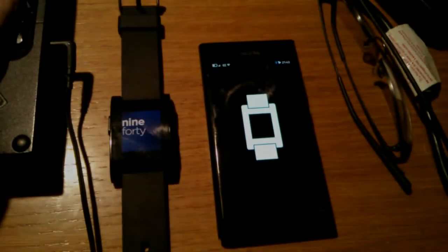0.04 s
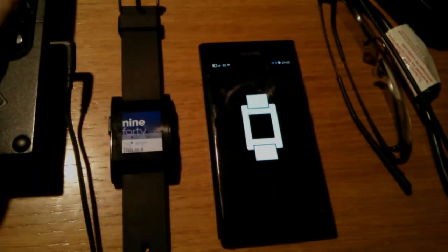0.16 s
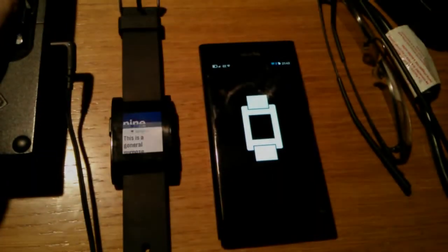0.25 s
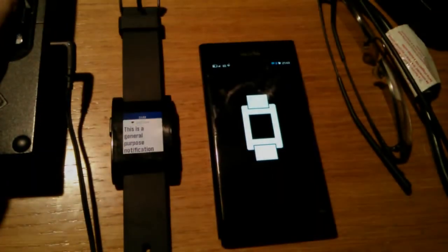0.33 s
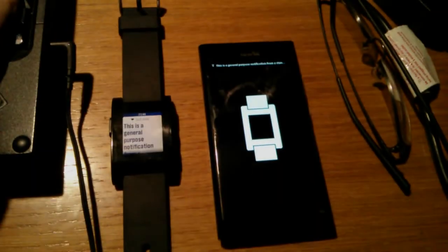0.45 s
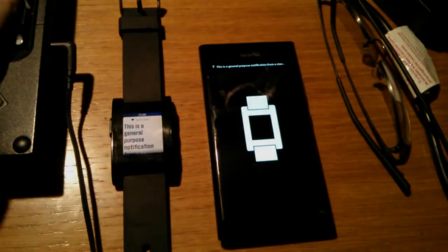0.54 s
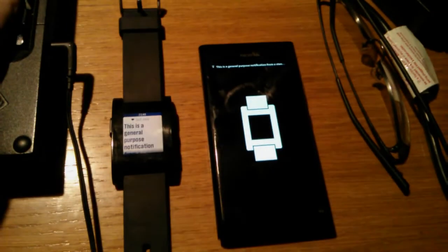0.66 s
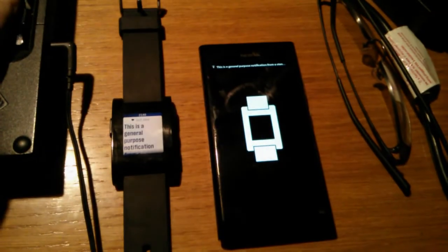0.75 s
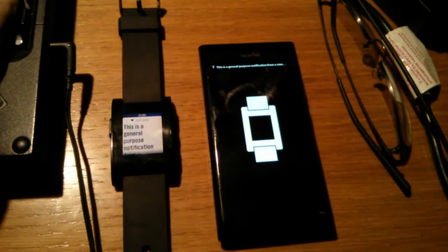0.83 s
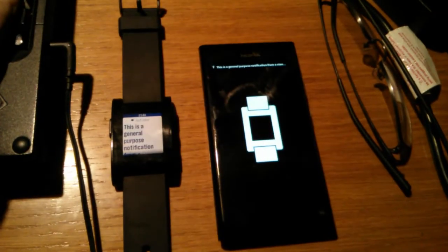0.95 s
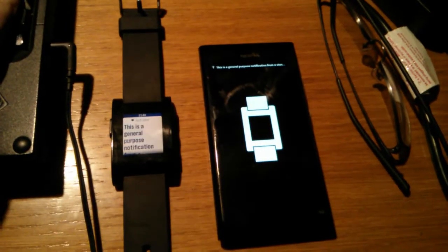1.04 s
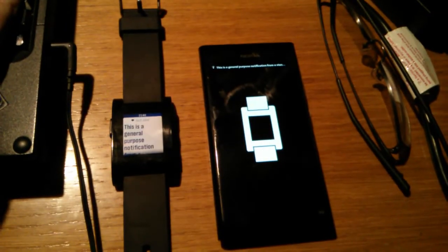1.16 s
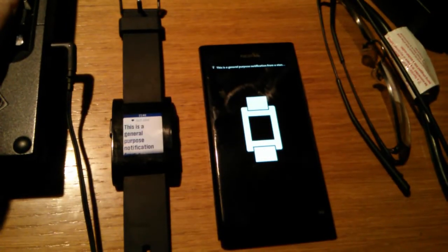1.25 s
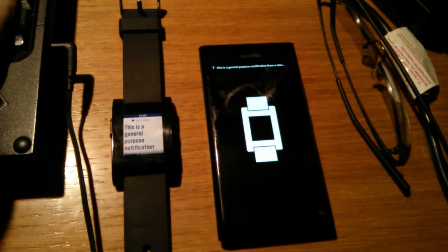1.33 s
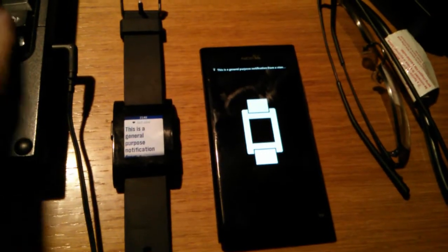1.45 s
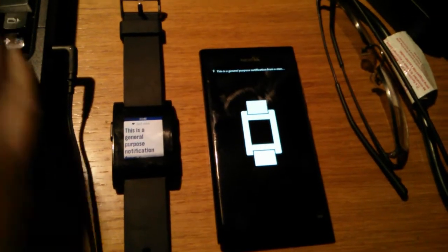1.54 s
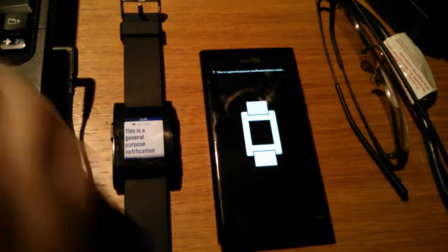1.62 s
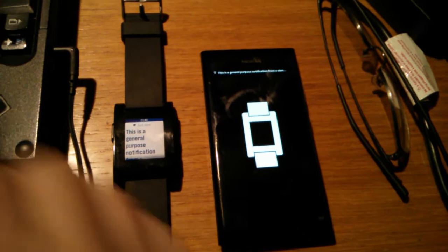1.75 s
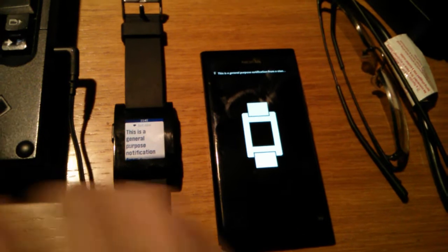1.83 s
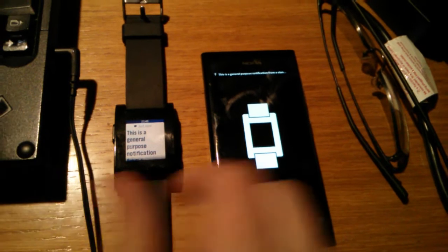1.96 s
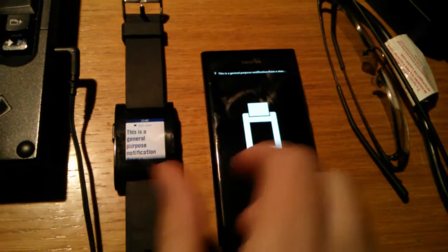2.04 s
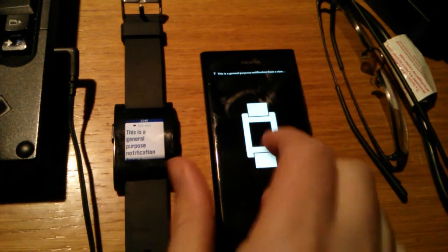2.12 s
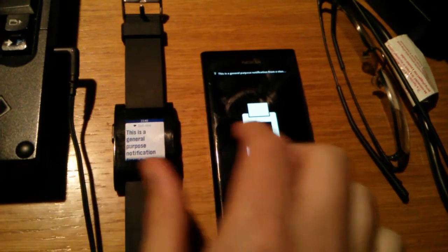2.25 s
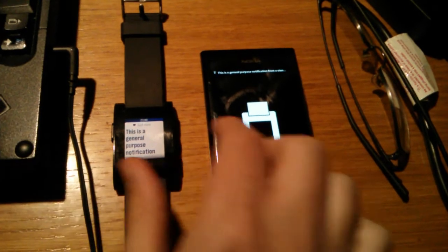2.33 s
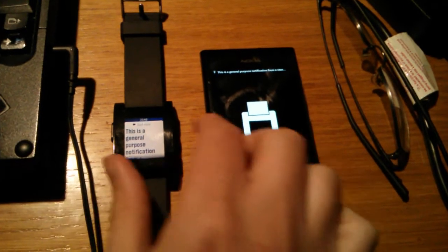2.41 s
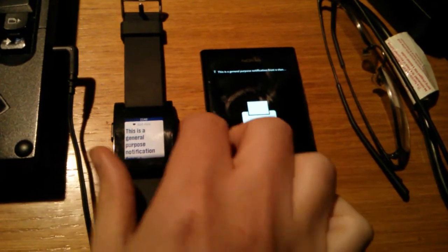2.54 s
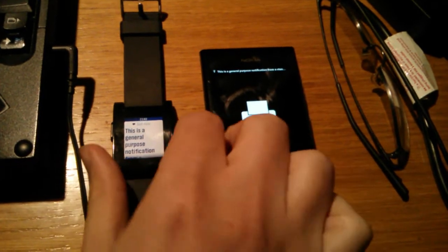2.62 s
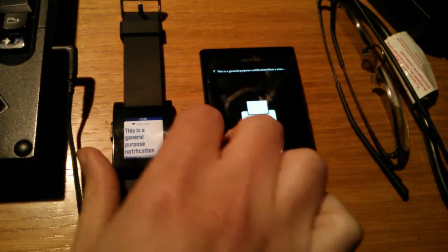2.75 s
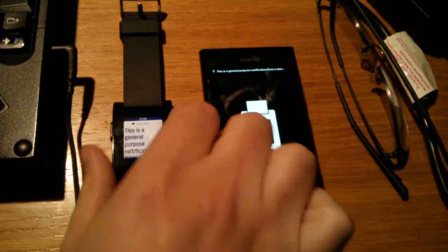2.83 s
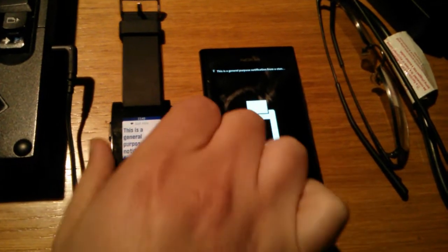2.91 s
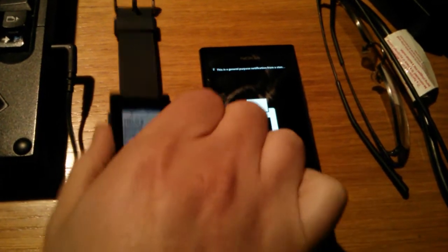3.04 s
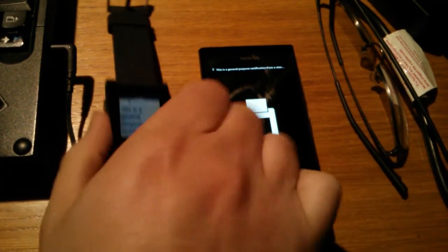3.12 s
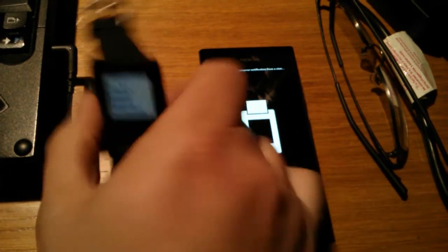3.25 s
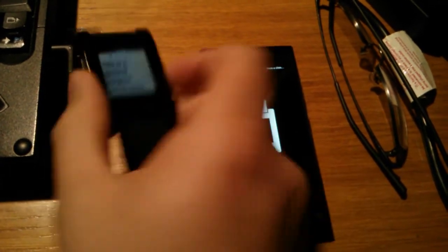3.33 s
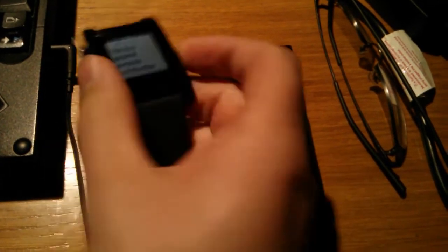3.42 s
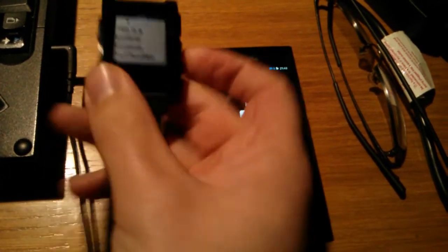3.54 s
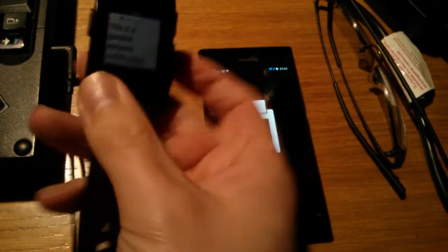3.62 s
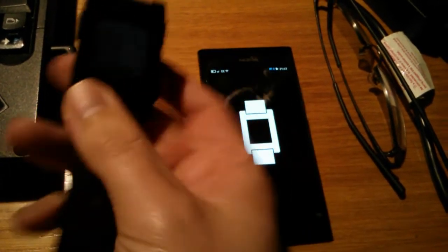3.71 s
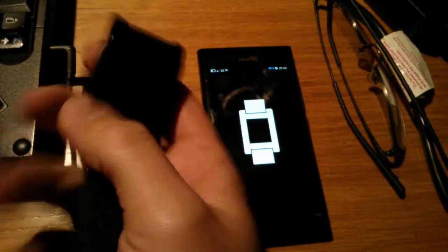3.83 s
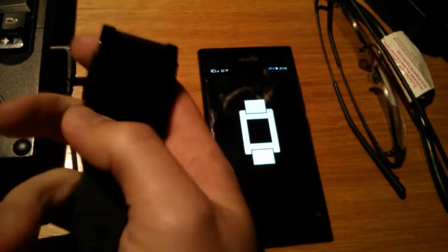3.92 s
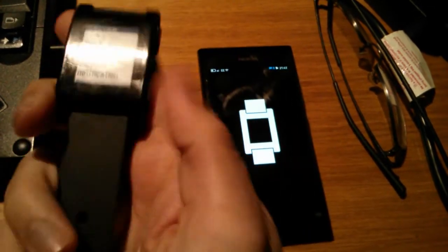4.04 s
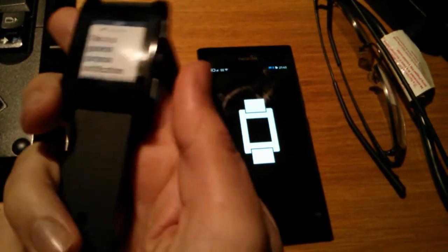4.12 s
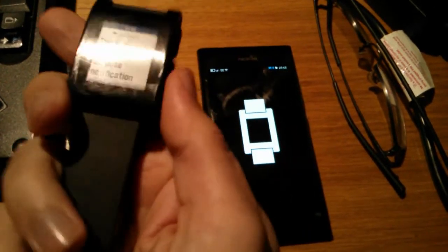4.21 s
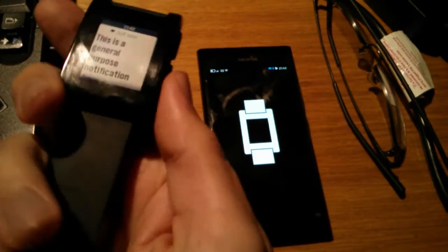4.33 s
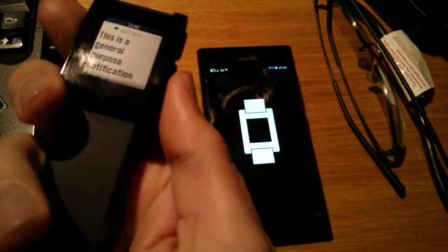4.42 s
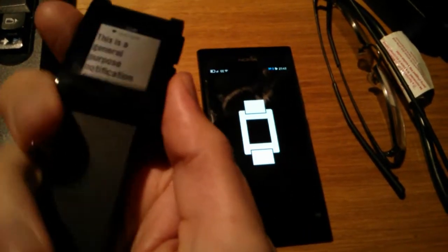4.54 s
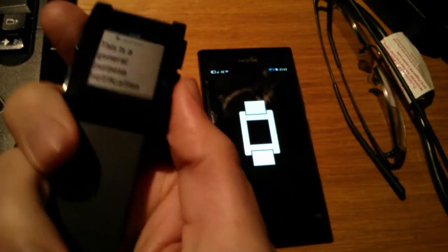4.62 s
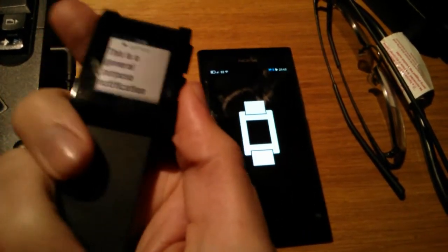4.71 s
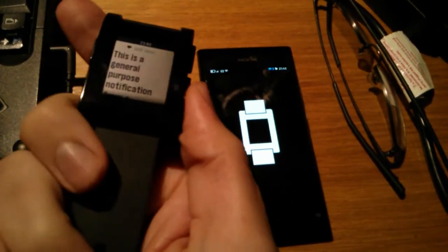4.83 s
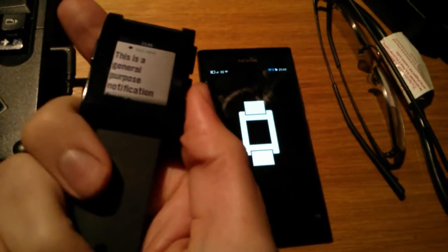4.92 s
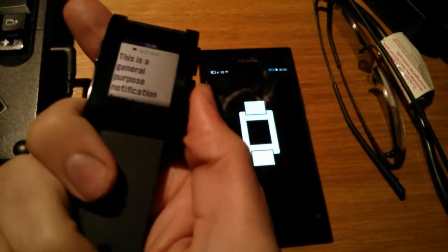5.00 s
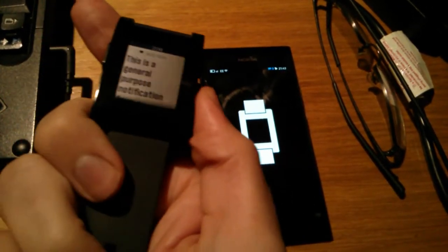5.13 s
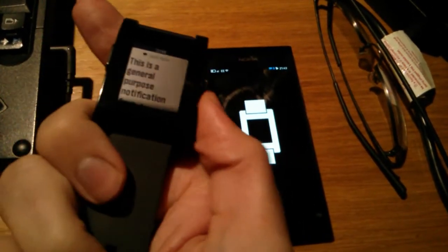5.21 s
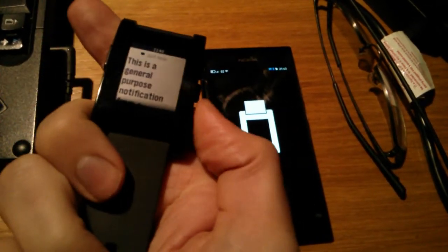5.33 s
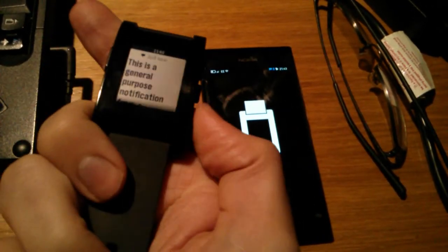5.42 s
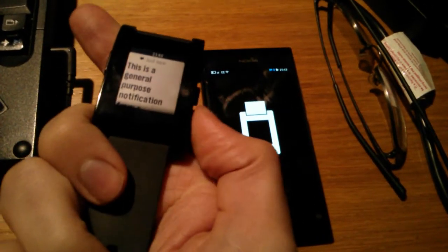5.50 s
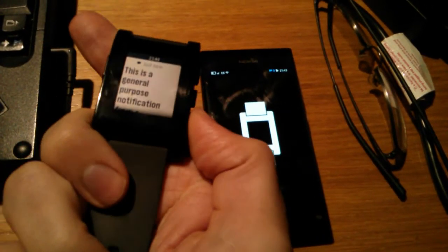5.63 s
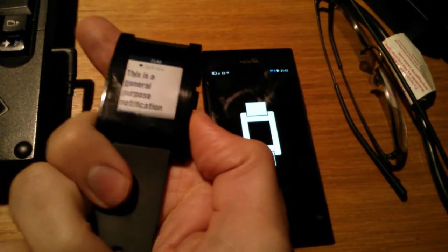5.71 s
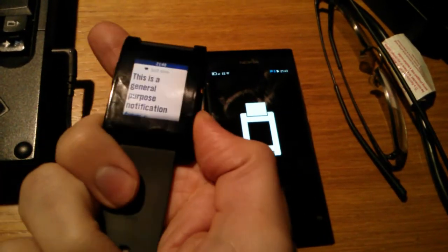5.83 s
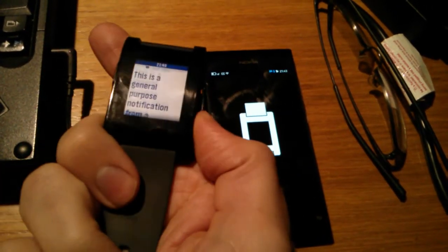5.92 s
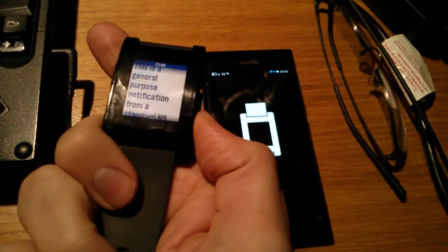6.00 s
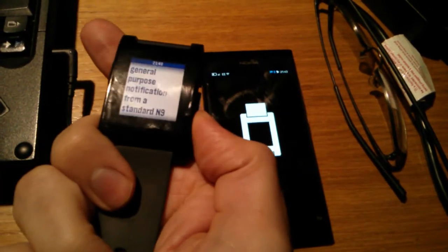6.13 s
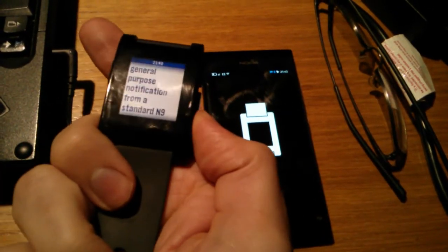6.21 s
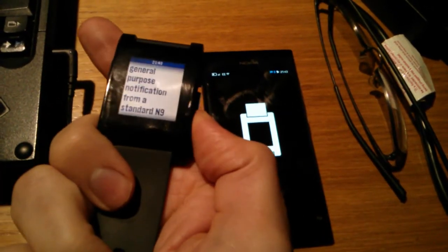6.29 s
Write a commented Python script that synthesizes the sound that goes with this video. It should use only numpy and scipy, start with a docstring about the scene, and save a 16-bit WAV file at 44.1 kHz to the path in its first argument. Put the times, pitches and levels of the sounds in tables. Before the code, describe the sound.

In a quiet room, over faint hiss, hum and rumble, a watch's small motor gives one brief, rattling buzz against a wooden desk. A light click follows, then after a pause a dull knock on the wood. The watch scrapes and taps as it is lifted; its buckle and strap snap, squeak softly and clack twice, the loudest sounds of all. Then only the background and one tiny tick remain. The microphone is close.

```python
"""Low rumble, a hum and microphone hiss fill a quiet room where a wrist watch lies on a wooden desk.
First its small motor buzzes once: an off-centre weight shakes the wood and the shaft rattles.
A second later something nearby clicks. Then a hand knocks the desk and drags the watch up:
the case scrapes, the strap squeaks, strap and buckle click. One faint tick comes near the end."""
import sys
import numpy as np
from scipy import signal
from scipy.fft import rfft, irfft
from scipy.io import wavfile
from scipy.ndimage import uniform_filter1d

SR = 44100
rng = np.random.default_rng(int(sys.argv[2]) if len(sys.argv) > 2 else 0)


def waveform_to_disk(signal):
    """Save audio, clipped to [-1, 1], as 16-bit WAV at the path in sys.argv[1]."""
    frames = np.transpose(np.atleast_2d(signal))
    scaled = np.clip(frames, -1, 1) * 32767
    samples = np.round(scaled).astype(np.int16)
    wavfile.write(sys.argv[1], SR, samples)


N = 280476
T = np.arange(N) / SR


def gain_of(db):
    """Turns decibels into a number to multiply by."""
    return 10 ** (np.asarray(db) / 20)


def unit_rms(x):
    """Scales a sound to an average strength (rms) of 1."""
    return x / np.sqrt(np.mean(x ** 2) + 1e-20)


def curves(rows, at=T):
    """Draws straight lines between a table's rows and reads off each later column."""
    points, *columns = np.transpose(rows)
    return [np.interp(at, points, column) for column in columns]


def add(mix, start_s, sound):
    """Mixes a sound in at its start time."""
    part = mix[round(start_s * SR):][:len(sound)]
    part += sound[:len(part)]


def resonate(x, hz, width_hz):
    """Keeps the sound near one pitch: shifts that pitch down to zero, smooths, shifts back."""
    turn = np.exp(2j * np.pi * np.cumsum(hz * np.ones(len(x))) / SR)
    keep = np.exp(-np.pi * width_hz / SR)
    return 2 * (turn * signal.lfilter([1 - keep], [1, -keep], x / turn)).real


def noise_band(count, first, second):
    """Noise passed through two resonances, each given as (pitch_hz, width_hz)."""
    return unit_rms(resonate(resonate(rng.standard_normal(count), *first), *second))


def noise(spectrum):
    """Steady noise with the given balance of low and high pitches."""
    hz, db = np.transpose(spectrum)
    shape_db = np.interp(np.log(np.fft.rfftfreq(N, 1 / SR) + 1), np.log(hz + 1), db)
    return unit_rms(irfft(rfft(rng.standard_normal(N)) * gain_of(shape_db), N))


def ring(modes, rise_s=.00079, spread_db=0.):
    """A struck part's tones, each fading 60 dB in its ring_s; where the blow lands changes the mix."""
    t = np.arange(6000) / SR
    out = np.zeros(len(t))
    for hz, db, ring_s in modes:
        louder, higher = spread_db * rng.standard_normal(2)
        tone = np.sin(2 * np.pi * hz * (1 + .00087 * higher) * t)
        out += gain_of(db + louder - 60 * t / ring_s) * tone
    out *= 1 - np.exp(-t / rise_s)
    return out / abs(out).max()


# The rumble's tone: pitch_hz, relative_db
RUMBLE_TONE = [(8.8, -41), (15, -11.5), (43, 1), (81, 0), (113, -1), (145, -3.5), (169, -7.5), (189, -3.5),
               (238, -16), (320, -24.5), (420, -57), (700, -120)]
# Its loudness: time_s, level_db
RUMBLE_LOUDNESS = [(0.0, -73), (0.23, -68), (0.41, -61.5), (1.17, -72), (1.5, -64.5), (2.53, -70.5),
                   (2.99, -61), (4.18, -70.5), (4.94, -66), (5.44, -69), (5.86, -65.5), (6.36, -64)]

def rumble():
    """A low rumble that rises and falls unevenly."""
    lumps = unit_rms(uniform_filter1d(uniform_filter1d(rng.standard_normal(N), 3000), 3000))
    return gain_of(curves(RUMBLE_LOUDNESS)[0] + 1.5 * lumps) * noise(RUMBLE_TONE)


# The hum's swells: peak_s, level_db, half_length_s
HUM_SWELLS = [(3.1, -62.5, .22), (6.3, -62.5, .45)]

def hum(pitch_hz=148.3, steady_db=-75.5):
    """A fuzzy hum that swells twice."""
    swells = sum(gain_of(db) * np.exp(-((T - s) / half) ** 2) for s, db, half in HUM_SWELLS)
    return (gain_of(steady_db) + swells) * noise_band(N, (pitch_hz, 36), (pitch_hz, 9.4))


# The hiss's tone: pitch_hz, relative_db
HISS_TONE = [(150, -36), (250, -5.5), (369, -6), (444, -6), (563, -9), (623, -6), (830, -9), (934, -4),
             (1070, -10.5), (2000, -15), (2490, -23), (9460, -13.5), (14200, -11.5), (16500, -11.5)]
# Its loudness: time_s, level_db
HISS_LOUDNESS = [(0, -77), (.8, -75), (2.7, -75), (3.6, -68), (4.4, -74.5), (6.36, -76)]

def hiss(whine_hz=15000, whine_relative_db=-6):
    """Microphone hiss and a thin electronic whine drift in loudness together."""
    whine = gain_of(whine_relative_db) * np.sqrt(2) * np.sin(2 * np.pi * whine_hz * T)
    return gain_of(curves(HISS_LOUDNESS)[0]) * (noise(HISS_TONE) + whine)


# How the room rings on: pitch_hz, ring_s, relative_db
ROOM_TAIL = [(200, .25, -2), (700, 0.33, -3), (1400, 0.18, -0.5), (2050, .22, 3), (3000, 0.15, -4.5),
             (5000, 0.22, -3), (8000, 0.22, -4.5), (12094, 0.15, -5)]

def room(x, near_db=-6, wall_db=-19, tail_db=-15):
    """Sound bounces off things on the desk, then off one wall, then dies away in the room."""
    t = np.arange(SR // 2) / SR
    bounces = np.zeros(len(t))
    at = np.arange(0, len(t) - 10, 10) + rng.integers(0, 10, (len(t) - 1) // 10)
    bounces[at] = rng.choice([-1., 1.], len(at))
    near = bounces * np.exp(-t / .005) * (t > .0008)
    hz, frame_s, bands = signal.stft(bounces * (t > .006), SR, nperseg=256)
    ring_s, colour_db = curves(ROOM_TAIL, hz[:, None])
    bands *= gain_of(colour_db - 60 * frame_s / ring_s)
    tail = signal.istft(bands, SR, nperseg=256)[1][:len(t)]
    echo = gain_of(near_db) * near / np.linalg.norm(near)
    echo += gain_of(tail_db) * tail / np.linalg.norm(tail)
    echo[round(.0105 * SR)] += gain_of(wall_db)
    return x + signal.fftconvolve(x, echo)[:N]


# Soft pushes on the desk: start_s, level_db, pitch_hz
DESK_PUSHES = [(1.410, -52.5, 79), (1.437, -49.5, 69), (2.744, -40, 208), (2.885, -48.5, 147),
               (3.066, -54.5, 135), (3.173, -52.5, 149)]

def thuds():
    """A hand or the watch presses on the desk, which swings for a few low cycles."""
    out = np.zeros(N)
    for start_s, db, hz in DESK_PUSHES:
        add(out, start_s, gain_of(db) * ring([(hz, 0, .07)], rise_s=.0017))
    return out


def stroke(start_s, peak_s, peak_db, rise_db_per_s, fall_db_per_s):
    """Times, level and gain of one rub: it sets in, grows to its peak and fades."""
    t = np.arange(start_s, peak_s + 40 / fall_db_per_s, 1 / SR)
    level_db = peak_db - np.where(t < peak_s, rise_db_per_s, fall_db_per_s) * abs(t - peak_s)
    fade_in = np.minimum((t - start_s) / .017, 1) ** 2
    return t, level_db, fade_in * gain_of(level_db)


# Light touches: peak_s, level_db, fall_db_per_s, airy_relative_db
BRUSHES = [(1.412, -68.5, 114, 4), (2.762, -72, 141, -4), (2.886, -74, 350, -9)]

def brushing():
    """Skin or a sleeve brushes past: soft, bright noise with an airy top."""
    out = np.zeros(N)
    for peak_s, db, fall, airy_db in BRUSHES:
        t, _, gain = stroke(peak_s - .02, peak_s, db, 300, fall)
        brush = noise_band(len(t), (6600, 3000), (4800, 4400))
        airy = noise_band(len(t), (14000, 4000), (15000, 5000))
        add(out, t[0], gain * (brush + gain_of(airy_db) * airy))
    return out


# Rubs of the strap: peak_s, level_db
STRAP_RUBS = [(3.527, -56.5), (3.553, -57), (3.598, -74)]

def squeaks(pitch_hz=1933):
    """The strap rubs and gives short, fuzzy squeaks."""
    out = np.zeros(N)
    for peak_s, db in STRAP_RUBS:
        t, _, gain = stroke(peak_s - .03, peak_s, db, 900, 900)
        add(out, t[0], gain * noise_band(len(t), (pitch_hz, 280), (pitch_hz, 450)))
    return out


# Tones of the desk, watch case and clasp (also used below): pitch_hz, relative_db, ring_s
DESK_TONES = [(374, -6, 0.061), (406, 8, 0.043), (452, -4.5, 0.066), (676, -19, 0.036)]
CASE_TONES = [(790, -6, .03), (964, -2, .03), (1200, -3, .028), (1380, 0, .032), (1600, -5, .022),
              (1800, 0, .024), (1990, 0, .026), (2350, -5, .022)]
CLASP_TONES = [(2665, -8, .022), (2990, -1, .021), (3335, -3, .02), (3680, -4, .022), (4000, -4, .02),
               (4450, -2, .014), (4690, -2, .012), (5200, -5, .015), (5600, -6, .015), (6350, -7, .016)]
# Pulls across the wood: start_s, peak_s, level_db, fall_db_per_s
PULLS = [(3.076, 3.098, -74, 304), (3.223, 3.348, -50.5, 900)]

def dragging(slips_per_s=2500, rise_db_per_s=97):
    """The watch slides in tiny, uneven slips that knock its case and, as pressure builds, its clasp."""
    out = np.zeros(N)
    for start_s, peak_s, db, fall in PULLS:
        t, level_db, gain = stroke(start_s, peak_s, db, rise_db_per_s, fall)
        slips = gain_of(3.78 * rng.exponential(1, (2, len(t))))
        slips *= rng.random(slips.shape) < slips_per_s / SR
        slips *= rng.choice([-1., 1.], slips.shape)
        body = ring(CASE_TONES) + .584 * ring(CASE_TONES[1:4]) + .13 * ring(DESK_TONES)
        clasp = ring(CLASP_TONES[:5]) * np.exp(-np.arange(6000) / 100)
        dull = unit_rms(signal.oaconvolve(slips[0], body)[:len(t)])
        bright = unit_rms(signal.oaconvolve(slips[1], clasp)[:len(t)])
        bright_db = -1.5 + 1.1 * (level_db + 48.5)  # louder is also brighter
        add(out, start_s, gain * (dull + gain_of(bright_db) * bright))
    return out


# Tones of the buckle pin and of something small beside the desk: pitch_hz, relative_db, ring_s
PIN_TONES = [(6770, -7, .018), (7000, -8, .018), (7830, -1, .024), (8060, -3, .022), (8450, -6, .025),
             (9200, -11, .02), (10300, -15, .02), (11600, -20, .02)]
NEARBY_TONES = [(960, 0, .028), (1250, -10, .02), (1990, -4, .022), (2250, -6, .025), (3500, -8, .012)]
# What each mix adds to ring_db: crack_db, desk_db, case_or_nearby_db, clasp_db, pin_db
MIXES = {"click": (-10, -19.5, -0.5, -13, -32), "tap": (-17, -17.5, -0.5, -16, -24),
         "knock": (-19, -1.5, -29, -42, -44), "tick": (-8, -10, -9, -17, 0), "snap": (2, -17, -11, -6, -1),
         "clack": (-8.5, -18.5, -4, -1, -24)}
# Short sounds: start_s, tick_db, tick_hz, ring_db, mix_name (picks a row of MIXES; "click" also rings the
# nearby object's tones in place of the case's) The row at 3.802 s is a faint low sound just before the clack.
SHORT_SOUNDS = [(1.3929, -32.5, 6150, -42, "click"), (1.405, -53, 9500, -50.5, "click"),
                (2.412, -74, 1000, -74, "tap"), (2.424, -57.5, 7000, -71, "tick"),
                (2.7430, -30, 5560, -31, "knock"), (3.0923, -57.5, 2470, -71, "tap"),
                (3.255, -61, 7000, -62, "tick"), (3.2989, -54, 6370, -41.5, "tap"),
                (3.314, -49, 8000, -47.5, "tap"), (3.3413, -50, 4000, -32, "tap"),
                (3.352, -59, 7000, -44, "tap"), (3.4468, -10, 7800, -26, "snap"),
                (3.458, -14, 6050, -28, "snap"), (3.7193, -47.5, 3320, -38.5, "tap"),
                (3.802, -65.5, 998, -53.5, "tap"), (3.812, -8.5, 6670, -19.5, "clack"),
                (3.8655, -14, 8000, -21.5, "clack"), (5.7945, -59, 7000, -81, "tick")]

def clicks():
    """Each short sound is a tick, a noisy crack and the ringing of hard parts."""
    out = np.zeros(N)
    t, crack_t = np.arange(-40, 120) / SR, np.arange(2000) / SR
    tick_shape = np.exp(-np.where(t < 0, (t / .00012) ** 2, t / .00022))
    swell = 1 - np.exp(-crack_t / .001)  # the crack builds just behind the tick
    for start_s, tick_db, tick_hz, ring_db, mix_name in SHORT_SOUNDS:
        crack_db, *part_db = ring_db + np.array(MIXES[mix_name])
        add(out, start_s + t[0], gain_of(tick_db) * tick_shape * np.sin(2 * np.pi * tick_hz * t))
        crack = noise_band(len(crack_t), (tick_hz, 3600), (tick_hz, 4500))
        add(out, start_s, gain_of(crack_db - 60 * crack_t / .036) * crack * swell)
        parts = (ring(DESK_TONES, .00042, 1.7),
                 ring(NEARBY_TONES if mix_name == "click" else CASE_TONES, .0011, .6),
                 ring(CLASP_TONES, .0035, 1.),
                 ring(PIN_TONES, .00039, .8))
        add(out, start_s, gain_of(part_db) @ parts)
    return out


def desk_boost(hz):
    """The desk answers most strongly near its two resonances."""
    return 1 + 2.9 / (1 + ((hz - 370) / 40) ** 2) + 11 / (1 + ((hz - 222) / 12) ** 2)


FULL_SPEED_HZ = 119.7  # motor turns per second
# Tones of the bouncing watch: multiple_of_motor_speed, relative_db
BUZZ_TONES = [(1, -23), (2, -11), (3, 0), (4, -1), (5, -14), (6, -7), (7, -23), (8, -11), (9, -29),
              (10, -21), (11, -40), (12, -36), (13, -42), (14, -32), (15, -31), (16, -23), (17, -38),
              (18, -36), (19, -43), (20, -46), (21, -50), (22, -41)]

def bouncing(speed_hz, turns, slowness):
    """The watch pushes on the wood; the tones waver as the contact shifts."""
    wavers = uniform_filter1d(rng.standard_normal((len(BUZZ_TONES), len(turns))), 500, axis=1)
    out = np.zeros(len(turns))
    for (k, db), waver in zip(BUZZ_TONES, wavers):
        level_db = db + 1.94 * unit_rms(waver) - 10 * k * slowness  # a slow motor sounds duller
        boost = desk_boost(k * speed_hz) / desk_boost(k * FULL_SPEED_HZ)
        out += gain_of(level_db) * boost * np.cos(2 * np.pi * k * turns + .4 * k ** 2)
    return out


# Tones of the motor's housing: pitch_hz, width_hz, relative_db
HOUSING_TONES = [(5730, 310, -6.5), (6040, 510, 3.5), (7800, 1000, -4.5), (10000, 2300, -5.5),
                 (11500, 1300, 1.5), (14100, 2300, -1.5)]

def rattling(turns, slowness, flare):
    """Twice a turn the shaft knocks its housing; flare lifts the lowest tone."""
    beats = np.diff(np.floor(2 * turns), prepend=0) * gain_of(.97 * rng.standard_normal(len(turns)))
    grit = np.exp(-(2 * turns % 1) / 3) * rng.standard_normal(len(turns))
    knocks = unit_rms(beats) + grit
    sag = 1 - .08 * slowness  # lower in pitch while the shaft is slow
    tones = [gain_of(db) * resonate(resonate(knocks, hz * sag, width), hz * sag, width) / np.sqrt(width)
             for hz, width, db in HOUSING_TONES]
    return unit_rms(sum(tones) + flare * tones[0])


def motor(on_s=.144, rattle_s=.172, bounce_s=.178, hop_s=.2095, off_s=.402):
    """An off-centre weight spins up, makes the watch rattle, bounce and hop, then coasts down."""
    spin_up_s, coast_hz_per_s, held_hz = .025, 460, 96
    t = np.arange(on_s, off_s + .1, 1 / SR)
    since_off = np.maximum(t - off_s, 0)
    speed_hz = FULL_SPEED_HZ * (1 - np.exp(-(t - on_s) / spin_up_s)) - coast_hz_per_s * since_off
    # the desk's resonance holds the shaft back until the watch hops free
    speed_hz = np.minimum(speed_hz, held_hz + 2500 * np.maximum(t - hop_s + .005, 0))
    turns, slowness = np.cumsum(speed_hz) / SR, 1 - speed_hz / FULL_SPEED_HZ

    buzz = bouncing(speed_hz, turns, slowness)
    hop = ring(CASE_TONES[:3], .0012) + .7 * ring(DESK_TONES)
    loose_parts = hop + .4 * ring(CASE_TONES[5:] + CLASP_TONES[:1], .0012)
    chatter = unit_rms(signal.oaconvolve(rng.standard_normal(len(t)), loose_parts)[:len(t)])
    buzz += .1 * (1 - slowness) ** 8 * chatter
    buzz_db = -45.5 - 11000 * since_off ** 2  # settles ever faster once the power is off
    buzz *= np.clip((t - bounce_s) / .014, 0, 1) ** 2 * gain_of(buzz_db)

    flare = gain_of(18) * np.exp(-((t - hop_s - .01) / .026) ** 2)  # while the watch hops
    rattle = rattling(turns, slowness, flare)
    rattle_db = -61.5 - 7 * (t - rattle_s) - 300 * since_off
    rattle *= np.clip((t - rattle_s) / .0049, 0, 1) * gain_of(rattle_db)

    out = np.zeros(N)
    add(out, on_s, buzz + rattle)
    for k in range(4):  # the hops get weaker and further apart
        add(out, hop_s + .0045 * k * 1.2 ** (k / 2), gain_of(-41 - 2.5 * k) * hop)
    return out


def scene():
    """The buzz and the handling echo in the room, over the thuds and the background."""
    buzz = room(motor(), near_db=-26, wall_db=-26, tail_db=-17)
    handling = room(clicks() + dragging() + squeaks() + brushing())
    return (buzz + handling + thuds() + rumble() + hum() + hiss())[None]


def record(dry, top_hz=15900):
    """Cuts off the very highest treble."""
    return signal.oaconvolve(dry, signal.firwin(511, top_hz, window=("kaiser", 9), fs=SR)[None], "same")


dry = scene()
out = record(dry)
waveform_to_disk(out)
```